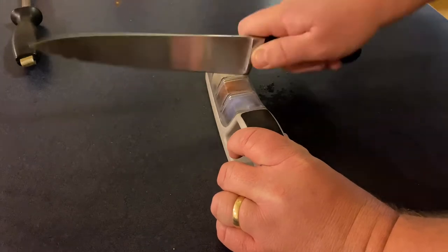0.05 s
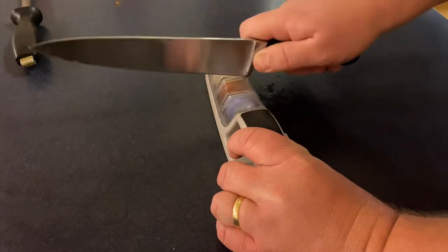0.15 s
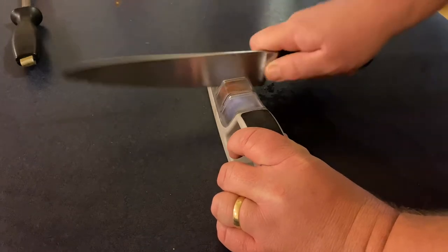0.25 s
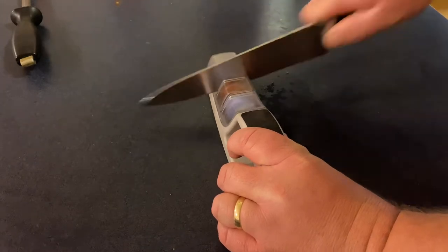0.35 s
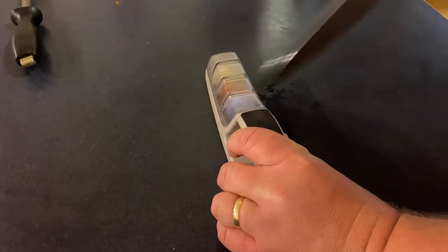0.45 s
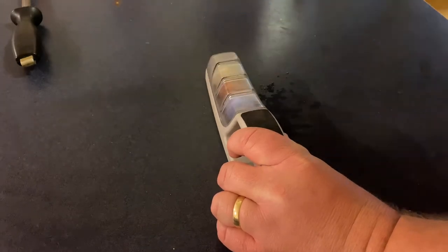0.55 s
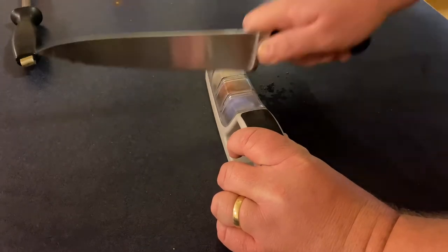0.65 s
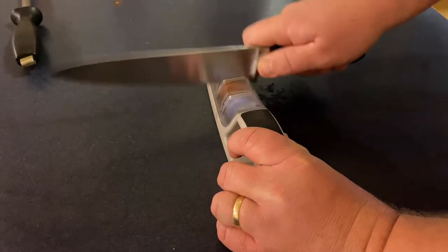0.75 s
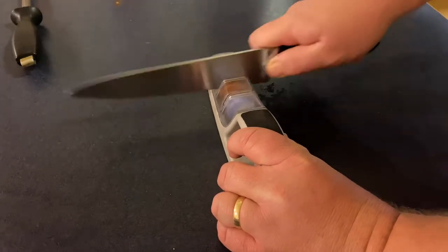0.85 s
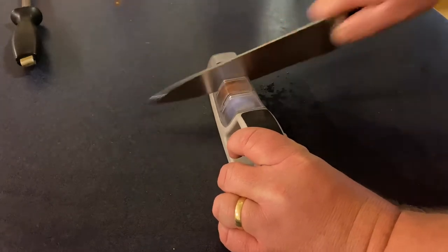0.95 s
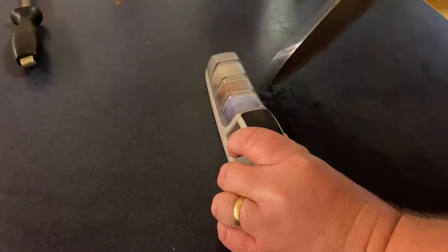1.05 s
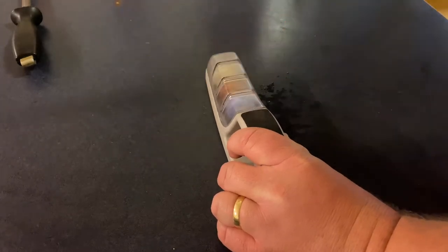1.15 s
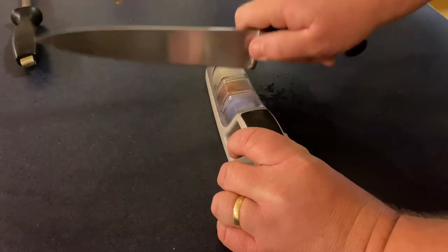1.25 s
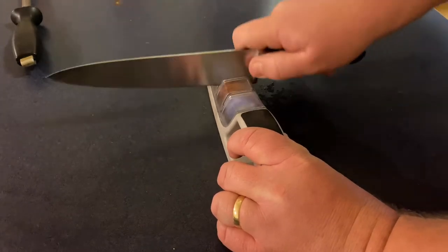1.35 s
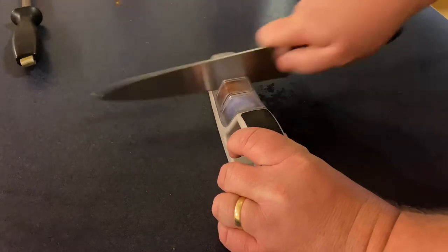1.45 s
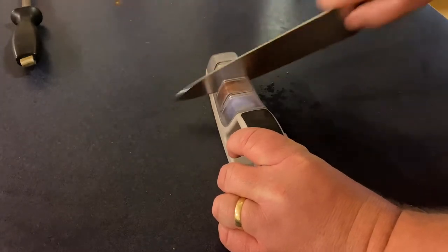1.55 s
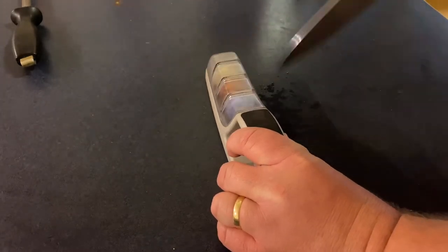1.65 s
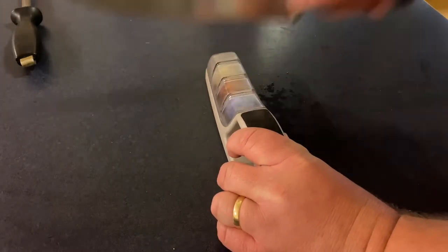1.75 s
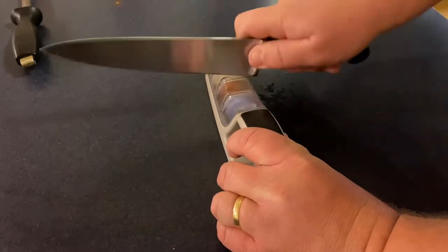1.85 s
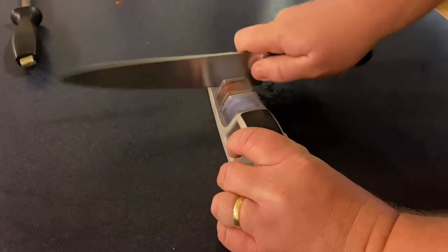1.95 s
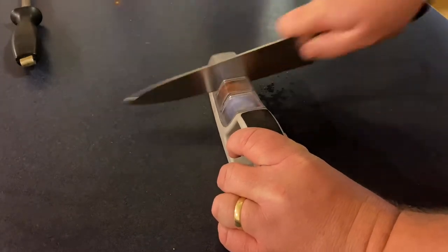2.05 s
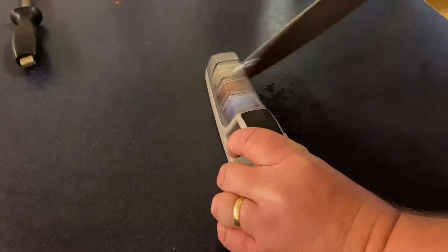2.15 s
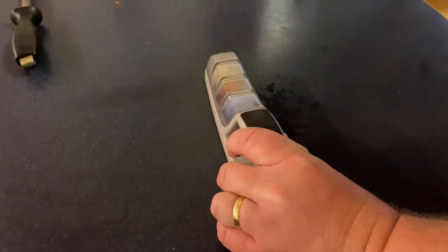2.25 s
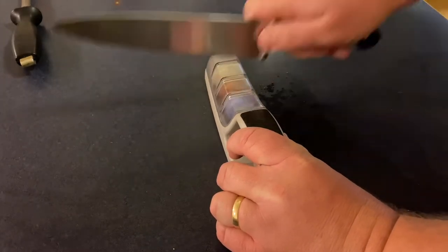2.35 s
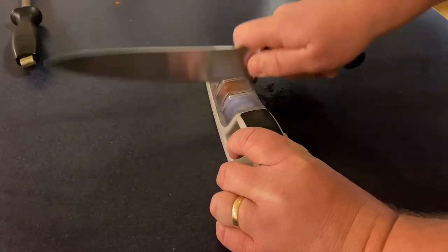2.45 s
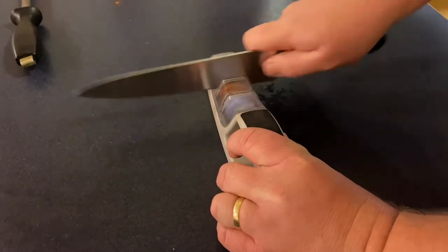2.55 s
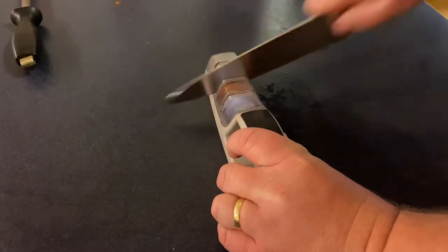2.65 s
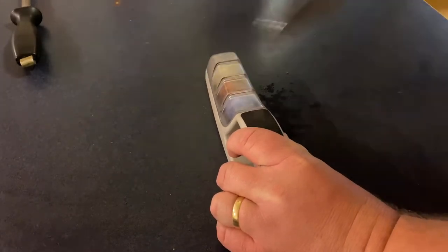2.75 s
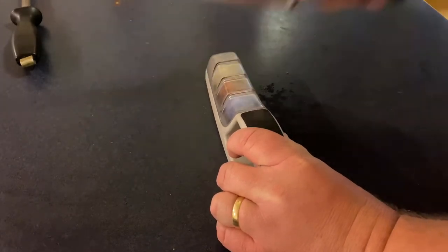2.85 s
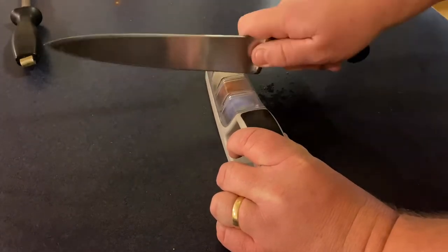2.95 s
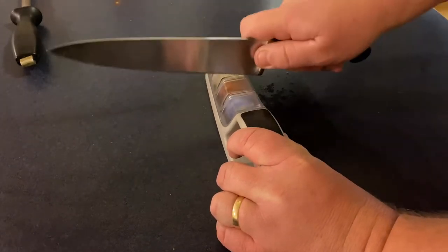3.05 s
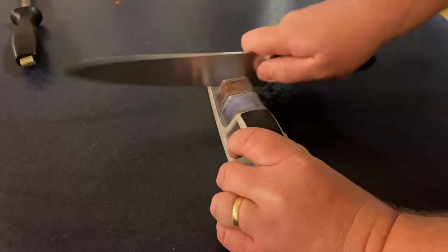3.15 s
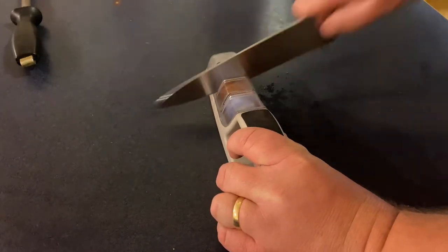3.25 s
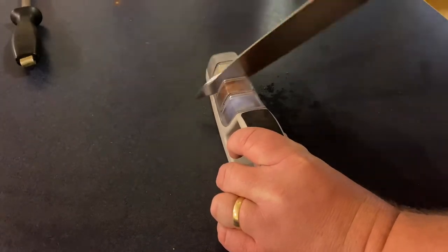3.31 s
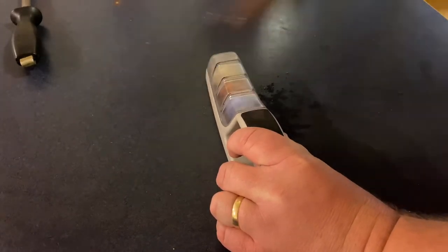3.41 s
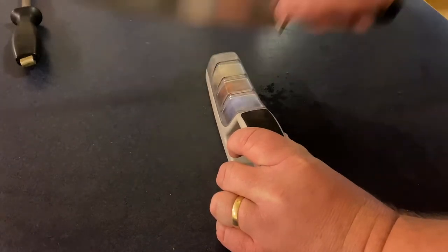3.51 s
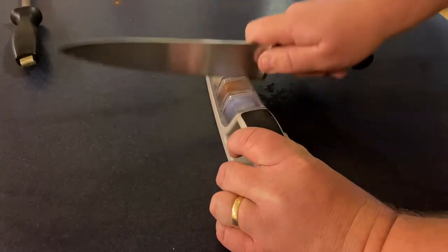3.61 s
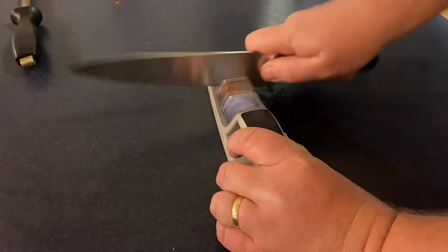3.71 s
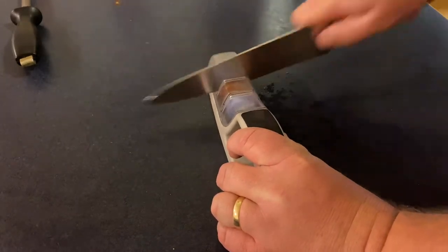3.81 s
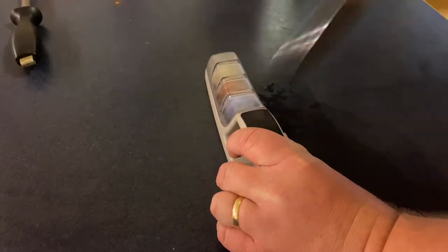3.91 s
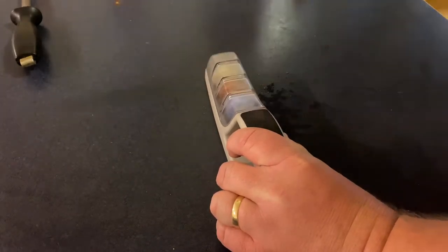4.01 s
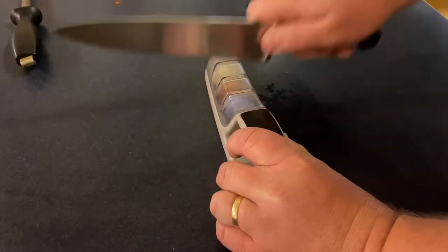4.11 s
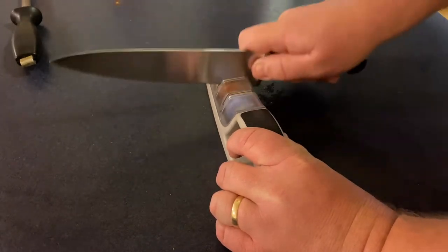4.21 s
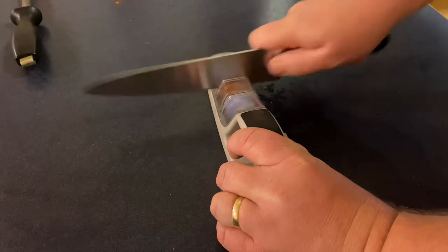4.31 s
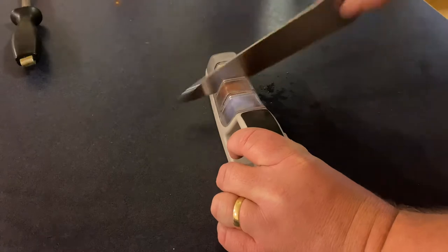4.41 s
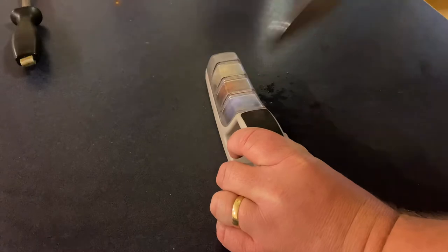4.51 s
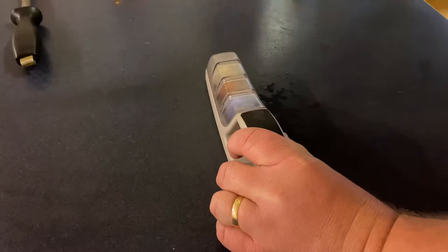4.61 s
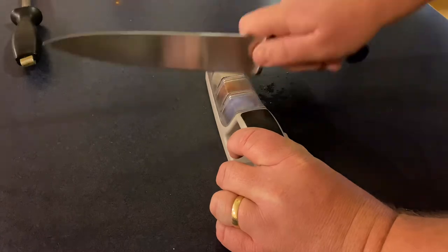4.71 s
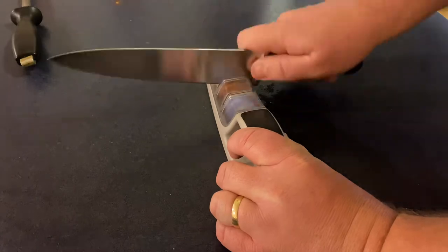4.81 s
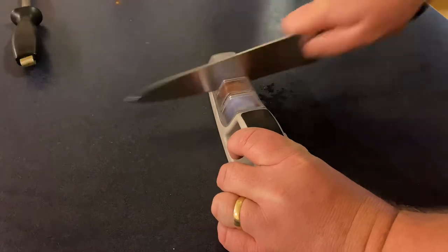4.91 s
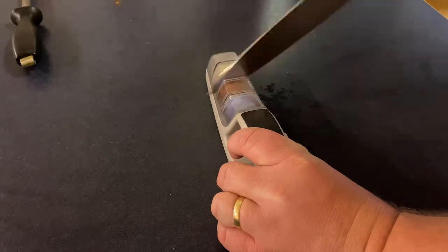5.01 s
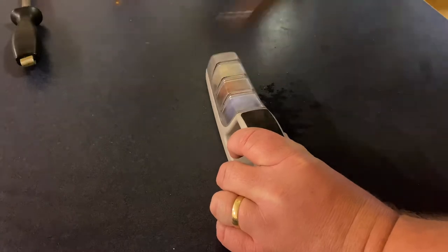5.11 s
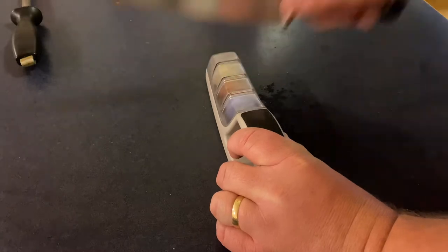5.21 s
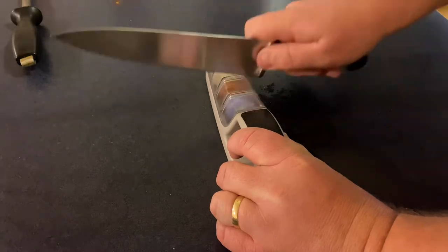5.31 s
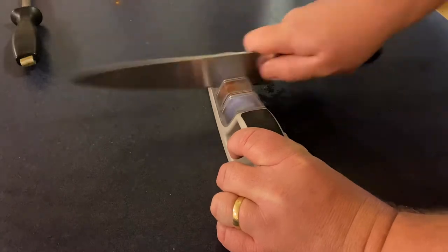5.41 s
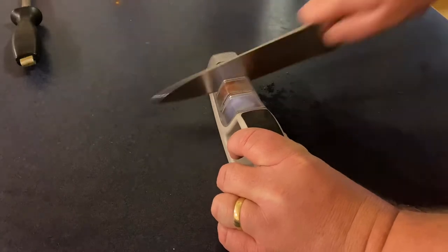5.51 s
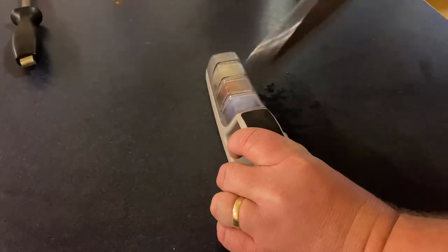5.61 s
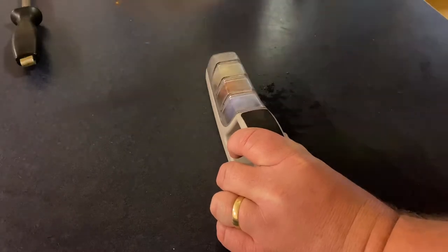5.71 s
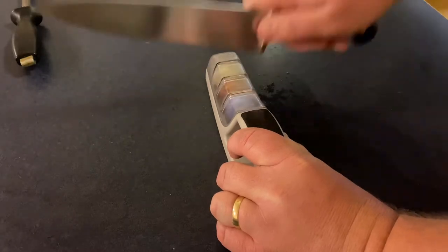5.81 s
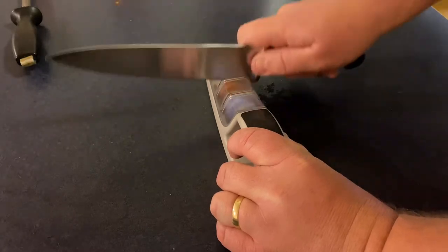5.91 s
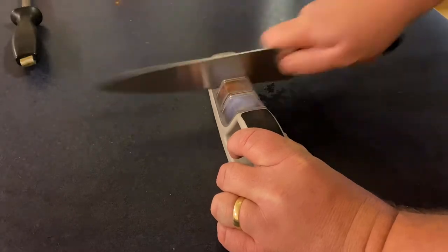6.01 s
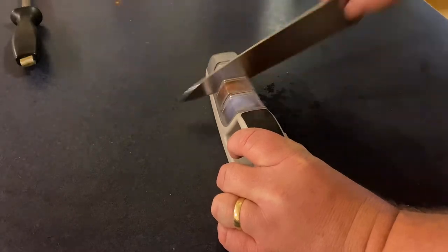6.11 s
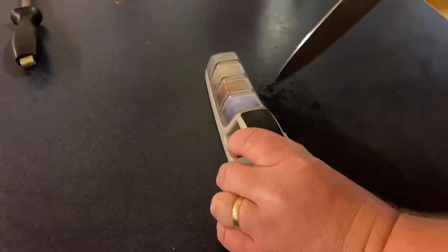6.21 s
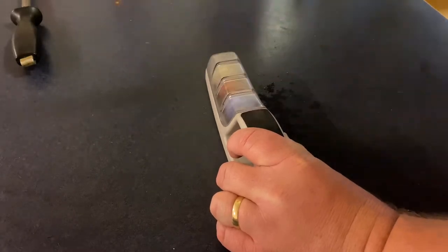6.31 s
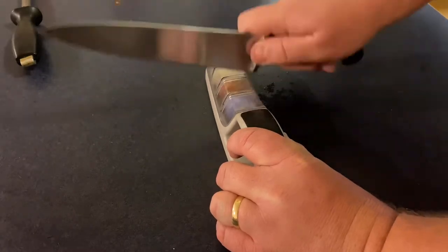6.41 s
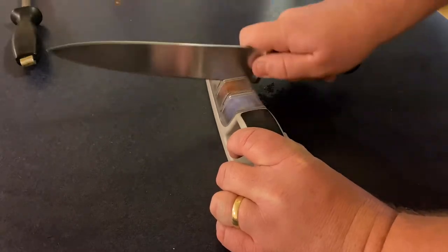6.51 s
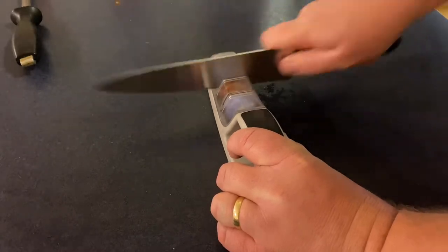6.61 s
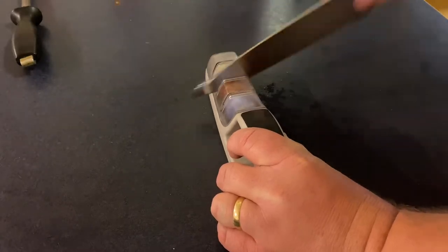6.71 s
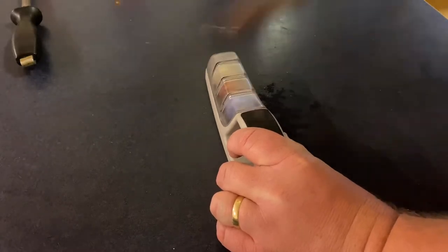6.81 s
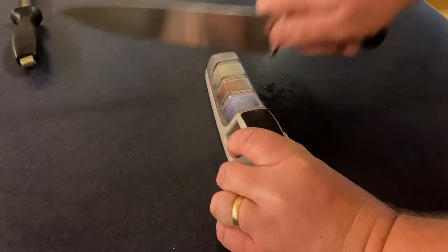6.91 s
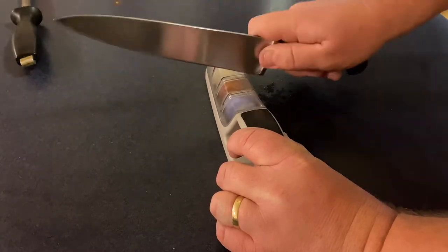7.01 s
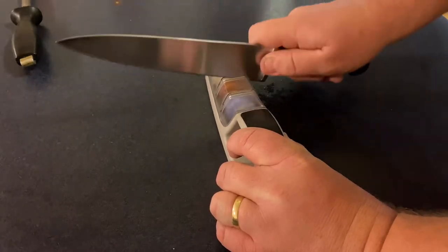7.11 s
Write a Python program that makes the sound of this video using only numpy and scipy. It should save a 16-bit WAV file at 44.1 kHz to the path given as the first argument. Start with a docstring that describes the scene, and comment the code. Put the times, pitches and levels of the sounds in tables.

```python
"""A steel kitchen knife is drawn twelve times through the ceramic wheel of a sharpener held down on a table.
Each pull is random bumps and grit exciting the resonances of table, housing and blade, brighter near the tip.
Blade knocks are filtered impulses with a crunch of noise; some pulls end as the tip snaps off the wheel.
Soft brushes, a faint whistle, noise-band hum and a low drone fill a small, quiet room with short reflections."""
import sys
import numpy as np
from scipy import signal
from scipy.fft import rfft, irfft
from scipy.io import wavfile

SR = 44100
rng = np.random.default_rng(int(sys.argv[2]) if len(sys.argv) > 2 else 0)


def store_pcm(level_fs):
    """Save levels as 16-bit WAV."""
    pcm = np.round(np.clip(level_fs, -1, 1) * 32767).astype(np.int16)
    wavfile.write(sys.argv[1], SR, np.atleast_2d(pcm).T)


N = 315481
T = np.arange(N) / SR  # time [s]

# resonances (+) and dead spots (-) of table, housing and blade: (centre [Hz], width [Hz], height [dB])
BODY_MODES = [(227, 47, 4), (315, 26.5, -5.5), (459.3, 58, 5), (493.6, 19, -29), (592, 360, 4.5),
              (711, 43, 4.5), (796, 75, 0), (1061, 43, 5), (1155, 106, -7.5), (1270, 54, -0.5),
              (1388, 116, -8), (1580, 120, 2.5), (1948, 33, -12), (2156, 95, 6), (2380, 79, 7),
              (2575, 30, 7), (2780, 16, 8), (3000, 89, 0.5), (3290, 260, 5), (3496, 89, 4.5),
              (3680, 60, -2.5), (3986, 170, 6), (4220, 44, -2.5), (4420, 79, 4.5), (5110, 88, 4),
              (5430, 54, 4.5), (5870, 31, 6), (8050, 310, 2)]
# broad spectral colour of a snap: (frequency [Hz], relative level [dB])
SNAP_COLOUR = [(30, -55), (130, -37), (200, -20), (300, -5.5), (550, 1), (1300, 2), (2200, -6.5),
               (4200, -10), (6000, -5.5), (8500, -14.5), (10700, -16.5), (15500, -20)]
# the tip snaps off the wheel; levels are relative within each column:
# (time [s], housing thud [dB], steel click [dB], table thump [dB], tip ring [Hz])
SNAP_EVENTS = [(.413, -10, -14, -77, 5140), (1.009, -20.5, -21, -78, 4000), (2.122, -7, -7.5, -65, 3860),
               (3.324, -41, -29, -80, 3540), (3.881, -9, -5, -48, 5640), (4.443, -28, -16, -77, 6230),
               (6.16, -9, -9, -71, 6480)]


def undb(db):
    """Logarithmic level: decibels to amplitude gain."""
    return 10 ** (np.asarray(db) / 20)


def unit(x):
    """Power normalization: scale to rms 1."""
    return x / np.sqrt(np.mean(x ** 2))


def bell(x, span):
    """Gaussian hump: 1 at x = 0, 1/e at one span to either side."""
    return np.exp(-(x / span) ** 2)


def through(x, response):
    """Linear time-invariant system: convolve x with an impulse response."""
    return signal.fftconvolve(x, response)[:len(x)]


def band(x, lo, hi):
    """Causal Butterworth band-pass."""
    sos = signal.butter(5, [lo, min(hi, .45 * SR)], "band", fs=SR, output="sos")
    return signal.sosfilt(sos, x)


def walk(rate):
    """Slow modulation: random knots, rate of them a second, joined by straight lines and scaled to rms 1."""
    knots = rng.standard_normal(N // 16)
    return unit(np.interp(T * rate, np.arange(len(knots)), knots))


def ringing(colour, resonances=(), size=8192):
    """Minimum phase: folding the cepstrum of a magnitude response yields its causal impulse response."""
    f = np.maximum(np.fft.rfftfreq(size, 1 / SR), 1)
    hz, db = np.transpose(colour)
    db = np.interp(np.log(f), np.log(hz), db)
    for centre, width, height in resonances:
        db = db + height / (1 + (2 * (f - centre) / width) ** 2)
    cepstrum = irfft(np.log(undb(db)))
    cepstrum[1:size // 2] *= 2
    cepstrum[size // 2 + 1:] = 0
    return irfft(np.exp(rfft(cepstrum)))


def grains(rate, spread_db):
    """Shot noise: tiny impacts at random moments, rate of them a second on average, of uneven size."""
    hit = rng.random(N) < rate / SR
    sign = rng.choice([-1, 1], N)
    return hit * sign * undb(spread_db * rng.standard_normal(N))


def background(air_db=-51, sway_db=0.7, drone_hz=153, drone_width_hz=24):
    """Filtered noise: swaying room air with faint resonant hum bands, over a narrow-band low drone."""
    # broad colour of the room air: (frequency [Hz], relative level [dB])
    air_colour = [(30, -33), (60, -30), (100, -26.5), (160, -7.5), (300, -7), (550, -12), (900, -12),
                  (1300, -17.5), (2000, -16.5), (3000, -23.5), (4000, -26.5), (7500, -28), (16000, -29.5)]
    # faint hum bands in the room air: (centre [Hz], width [Hz], height [dB])
    hum_bands = [(594.6, 27, 16.5), (720, 27, 7.5), (879, 18, 16), (1130, 23, 8), (1990, 36, 6.5),
                 (6230, 200, 11), (8370, 160, 9)]
    # the drone swells late on: (time [s], level [dB])
    drone_levels = [(0, -70.5), (2, -64), (3.6, -63), (5.6, -63.5), (6.3, -57), (6.9, -55.5), (7.15, -72)]
    air = unit(through(rng.standard_normal(N), ringing(air_colour, hum_bands)))
    air *= undb(air_db + sway_db * walk(rate=6))
    half_width = drone_width_hz / 2
    drone = unit(band(rng.standard_normal(N), drone_hz - half_width, drone_hz + half_width))
    return air + drone * undb(np.interp(T, *np.transpose(drone_levels)))


def blows(table, colour, resonances, thud_db, clack_db, tick_db, crunch_s, crunch, give_s, size=8192):
    """Impulse excitation: one push on the body with a brief crunch of steel on ceramic; the thud comes last."""
    out, t = np.zeros(N + 2 * size), np.arange(size) / SR
    push = ringing(colour, resonances)
    attack = SR // 100  # the first 10 ms set the level
    lags = (give_s + 0.0011, give_s, give_s)  # the wheel gives on its axle before it strikes home
    for s, thud, click, *_ in table:
        scratch = rng.standard_normal(size) * np.exp(-t / crunch_s)
        rough = push + crunch * through(push, scratch / np.linalg.norm(scratch))
        parts = (band(push, 40, 738), band(rough, 847, 3220), band(rough, 3240, 13800))
        levels = (thud + thud_db, click + clack_db, click + tick_db)
        for part, db, lag in zip(parts, levels, lags):
            start = max(int((s + lag) * SR), 0)
            out[start:start + size] += undb(db) * part / np.std(part[:attack])
    return out[:N]


def knocks():
    """Modal response: a blow of the blade against slot or wheel also rings the plastic slot."""
    # the blade knocks slot or wheel, between pulls, going in, or catching in mid-pull:
    # (time [s], relative housing thud [dB], relative steel click [dB])
    knock_events = [ (.013, -13.5, -21), (.03, -22, -23.5), (.173, -15.5, -23), (.185, -9, -34),
                    (.241, -17, -32), (.367, -19, -20.5), (.642, -28.5, -31.5), (.725, -29.5, -35),
                    (.739, -26, -42), (1.311, -24, -30), (1.804, -14, -27.5), (1.838, -33, -24),
                    (1.864, -20, -26.5), (1.941, -18.5, -26), (2.367, -41, -28.5), (2.407, -35, -31),
                    (2.421, -34, -34), (2.446, -17.5, -39), (2.566, -11.5, -20.5), (2.91, -14, -22.5),
                    (3.047, -33, -29), (3.063, -13, -21.5), (3.072, -14, -35), (3.237, -14, -18),
                    (3.558, -15, -33), (3.583, -33, -23.5), (3.617, -20.5, -29.5), (3.662, -18, -37),
                    (4.132, -34, -33), (4.165, -28, -24), (4.183, -19, -35), (4.234, -12.5, -28),
                    (4.708, -33, -24.5), (4.753, -23.5, -31), (4.762, -18.5, -45), (5.276, -40, -26),
                    (5.323, -28, -26), (5.326, -13.5, -24), (5.455, -27, -27), (5.852, -47, -31),
                    (5.894, -18.5, -25), (5.926, -9, -18.5), (5.938, -13, -28), (6.448, -28, -35.5),
                    (6.499, -11.5, -22), (6.938, -17, -27), (7.104, -34, -29.5), (7.113, -24.5, -30),
                    (7.139, -21, -35), ]
    # broad colour of a knock: (frequency [Hz], relative level [dB])
    knock_colour = [(50, -57), (130, -28.5), (220, -1.5), (350, 5), (550, 5), (800, -3), (1500, -16),
                    (2200, -19.5), (4200, -24), (6000, -23.5), (10700, -30), (15500, -34)]
    # the plastic slot rings when struck: (centre [Hz], width [Hz], height [dB])
    slot_modes = [(1035, 43, 5), (1610, 390, 11), (3870, 290, 6.5)]
    return blows(knock_events, knock_colour, [*BODY_MODES, *slot_modes], thud_db=-6.0, clack_db=-5.0,
                 tick_db=-10.5, crunch_s=0.0052, crunch=1.0, give_s=.0005)


def brushes(lo_hz=600, hi_hz=6500):
    """Light friction: short swells of grainy noise as steel softly touches plastic."""
    # the blade brushes past the housing: (time [s], full width at 1/e [s], level [dB])
    brush_events = [(0.117, 0.042, -50), (0.166, 0.016, -37), (1.281, 0.026, -41), (3.607, 0.013, -34),
                    (6.41, 0.018, -48.5), (7.048, 0.022, -40.5)]
    touch = sum(undb(db) * bell(T - s, length / 2) for s, length, db in brush_events)
    texture = through(grains(rate=2800, spread_db=10), ringing(SNAP_COLOUR, BODY_MODES))
    return touch * unit(band(texture, lo_hz, hi_hz))


def stroke(bite_s=.011, release_s=.0099, glide_hz=-900):
    """Moving contact: the edge slides heel to tip, giving its place, ring pitch [Hz] and four register gains."""
    # (from [s], to [s], effort [dB], time to bear down [s], effort gained from heel to tip [dB],
    #  ring boost [dB], place of most ring [0 heel - 1 tip], ring [Hz], hiss boost near the tip [dB])
    pull_events = [ (.186, .42, 0, 0.046, -0.5, 5.5, .78, 4240, 2),
                   (.783, 1.012, -0.8, .03, 4, 5.5, 0.67, 4000, 2),
                   (1.335, 1.586, -0.8, 0.039, -2.3, 5.5, 0.75, 4030, 5),
                   (1.894, 2.118, 0.84, .075, -0.5, 3, 0.69, 4000, 3),
                   (2.449, 2.674, .5, 0.065, 0, 4, 0.82, 4100, 6),
                   (3.083, 3.331, -1.3, 0.028, -0.5, 11, .73, 4190, 8.5),
                   (3.664, 3.878, 0, 0.012, .5, 5.5, 0.81, 4190, 9),
                   (4.233, 4.454, -0.5, 0.021, -0.5, 4.3, 0.72, 4210, 10),
                   (4.785, 5.015, -0.1, 0.026, -1.8, 6.5, 0.74, 4410, 8.5),
                   (5.361, 5.585, -0.45, 0.063, -7, 6, 0.72, 4240, 8),
                   (5.933, 6.156, -1.36, 0.02, -6.3, 7, 0.74, 4120, 7),
                   (6.505, 6.716, 1.5, 0.079, -4.5, 1, 0.68, 4220, 8), ]
    # each register: (base level at full pressure [dB], change while the edge only rests on the wheel [dB],
    #  change from heel to tip [dB])
    judder_levels = (-18.5, -5, -4)
    rasp_levels = (-25.5, -12, -2.1)
    ring_levels = (-29.4, -13.5, -1.1)
    hiss_levels = (-35, -13, -4)
    registers = (judder_levels, rasp_levels, ring_levels, hiss_levels)
    place, pitch, gains = np.zeros(N), np.full(N, float(pull_events[0][7])), np.zeros((4, N))
    for start, end, effort_db, press_s, lean_db, ring_db, ring_place, ring_hz, hiss_db in pull_events:
        # the edge meets the wheel just before the pull and leaves just after
        bite = np.clip((T - start) / bite_s + 1, 0, 1)
        touch = bite * np.clip((end - T) / release_s + 1, 0, 1)
        on = touch > 0
        along = np.clip((T[on] - start) / (end - start), 0, 1)
        slack = bell(along * (end - start), press_s)  # 1 = the edge only rests on the wheel
        boosts = (
            1 * bell(along - 0.58, 0.26),  # the judder swells just past mid-edge, by 1 dB
            0,
            ring_db * bell(along - ring_place, 0.13),
            hiss_db * bell(along - 0.89, 0.16),
        )
        for gain, (full_db, slack_db, tip_db), boost in zip(gains, registers, boosts):
            tilt = (tip_db + lean_db) * (along - .5)
            gain[on] = touch[on] * undb(full_db + effort_db + slack_db * slack + tilt + boost)
        place[on] = along
        pitch[on] = ring_hz + glide_hz * (along - ring_place)
    return place, pitch, gains


def grind(force, place, lo, hi):
    """Source-filter principle: one force drives the body, its colour sliding from heel to tip."""
    # broad colour near the heel: (frequency [Hz], relative level [dB])
    heel_colour = [(60, -63), (130, -45.5), (205, -9), (260, -2), (350, -1.5), (570, 5), (800, 1),
                   (1300, -4.5), (2200, -7.5), (3200, -14), (4200, -18), (8500, -26.5), (10700, -20),
                   (15500, -38)]
    # broad colour near the tip: (frequency [Hz], relative level [dB])
    tip_colour = [(60, -46), (130, -36), (205, -25.5), (330, -1), (570, 7.5), (800, -7.5), (1300, -3),
                  (2200, -11), (3200, -9), (4200, -12), (6000, -22.5), (8500, -24), (10700, -20),
                  (15500, -31)]
    heel = unit(band(through(force, ringing(heel_colour, BODY_MODES)), lo, hi))
    tip = unit(band(through(force, ringing(tip_colour, BODY_MODES)), lo, hi))
    return (1 - place) * heel + place * tip


def sing(scrape, gain, hz, width_hz, onset_db, most):
    """Stick-slip: the harder the edge is driven, the more one resonance stands out of the scrape."""
    lowpass = signal.butter(4, width_hz / 2, fs=SR, output="sos")
    sway = signal.sosfilt(lowpass, rng.standard_normal((2, N)))
    phase = 2 * np.pi * np.cumsum(hz) / SR
    tone = unit(sway[0] * np.cos(phase) + sway[1] * np.sin(phase))  # noise band centred on hz
    share = np.clip(most, 0, 1) / (1 + (undb(onset_db) / (gain + 1e-6)) ** 5)  # power share of the tone
    return gain * (np.sqrt(1 - share) * scrape + np.sqrt(share) * tone)


def pulls(chatter_db=1.0, wobble_db=0.78, lurch_db=1.0, heel_hz=665, tip_hz=540, hiss_hz=10600, drift=.035):
    """Forced vibration: wheel bumps shake housing and table; ceramic grit scratches the steel and rings it."""
    place, ring_hz, (judder, rasp, ring, hiss) = stroke()
    # the edge chatters, the hand wobbles
    pressure = undb(chatter_db * walk(rate=170) + wobble_db * walk(rate=43))
    bumps = grains(rate=1500, spread_db=2) * pressure
    grit = grains(rate=5000, spread_db=2.5) * pressure
    lurch = undb(lurch_db * walk(rate=55))  # the wheel turns unevenly
    grip = 1 + drift * walk(rate=12)  # resonances shift as the wheel clamps the blade more or less
    judder_hz = heel_hz + (tip_hz - heel_hz) * place  # the blade is less stiff near its tip
    out = sing(grind(bumps, place, 24, 977), judder * lurch, judder_hz * grip,
               width_hz=125, onset_db=-18.5, most=0.27)
    out += rasp * grind(grit, place, 955, 3390)
    out += sing(grind(grit, place, 3555, 6550), ring, ring_hz * grip,
                width_hz=450, onset_db=-26, most=0.86)
    out += sing(grind(grit, place, 6480, 15300), hiss, hiss_hz * grip,
                width_hz=1240, onset_db=-32.5, most=0.52)
    return out


def snaps():
    """Sudden release: the tip leaving the wheel strikes the body with a short, rough crunch."""
    return blows(SNAP_EVENTS, SNAP_COLOUR, BODY_MODES, thud_db=-5.5, clack_db=-7.5,
                 tick_db=-6.0, crunch_s=0.0017, crunch=1.6, give_s=0.0011)


def recoil(thump_db=3, thump_s=0.0037, ring_db=-21, ring_t60=0.18, ring_width_hz=800, size=8192):
    """Damped free vibration: after a snap the table top springs back and the freed tip rings briefly."""
    out, t = np.zeros(N + size), np.arange(size) / SR
    table_mode = signal.butter(2, [45, 130], "band", fs=SR, output="sos")
    thump = signal.sosfilt(table_mode, np.exp(-t / thump_s))
    half_width = ring_width_hz / 2
    for s, _, click, low, hz in SNAP_EVENTS:
        ring = unit(band(rng.standard_normal(size), hz - half_width, hz + half_width))
        start = int(s * SR)
        out[start:start + size] += ring * undb(click + ring_db - 60 * t / ring_t60)
        out[start:start + size] += undb(low + thump_db) * thump / np.abs(thump).max()
    return out[:N]


def whistle(at_s=2.8, length_s=.16, hz=7550, sag_hz_per_s=1900, width_hz=260, db=-67):
    """Quadrature modulation: two random walks make a very faint, thin whistle that sinks in one pause."""
    pitch = hz - sag_hz_per_s * np.clip(T - at_s, -length_s, length_s)
    phase = 2 * np.pi * np.cumsum(pitch) / SR
    tone = unit(walk(rate=width_hz) * np.cos(phase) + walk(rate=width_hz) * np.sin(phase))
    return undb(db) * bell(T - at_s, length_s) * tone


def room(x, early_db=-13, early_s=0.023, tail_db=-13.5, low_t60=0.18, high_t60=0.22, size=22050):
    """Reverberation: quick bright reflections off table top and nearby things, then a short decaying tail."""
    t = np.arange(size) / SR
    early = band(rng.standard_normal(size), 900, 18000) * np.exp(-t / early_s) * (t > .002)
    low = band(rng.standard_normal(size), 60, 3000) * undb(-60 * t / low_t60)
    high = band(rng.standard_normal(size), 3000, 18000) * undb(-60 * t / high_t60)
    tail = (low + high) * (t > .008)
    response = undb(early_db) * early / np.linalg.norm(early)
    response += undb(tail_db) * tail / np.linalg.norm(tail)
    response[0] = 1  # direct sound
    return through(x, response / np.linalg.norm(response))


def scene():
    """Superposition: contact sounds in the room, plus recoil, background and whistle added directly."""
    contacts = pulls() + knocks() + snaps() + brushes()
    return (room(contacts) + recoil() + background() + whistle())[None]


def record(dry, top_hz=15900, ceiling=.8):
    """Soft saturation: the loudest peaks are rounded between two zero-phase low-pass filters."""
    top = signal.ellip(8, .1, 50, top_hz, fs=SR, output="sos")
    heard = signal.sosfiltfilt(top, dry)
    rounded = heard / (1 + (heard / ceiling) ** 4) ** (1 / 4)
    return signal.sosfiltfilt(top, rounded)


dry = scene()
out = record(dry)
store_pcm(out)
```